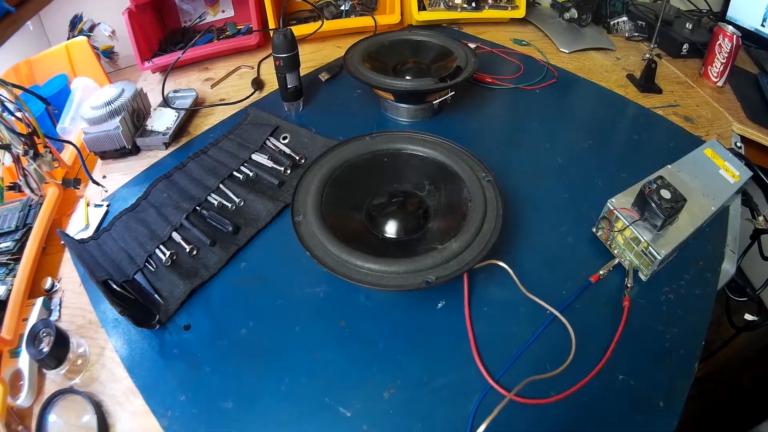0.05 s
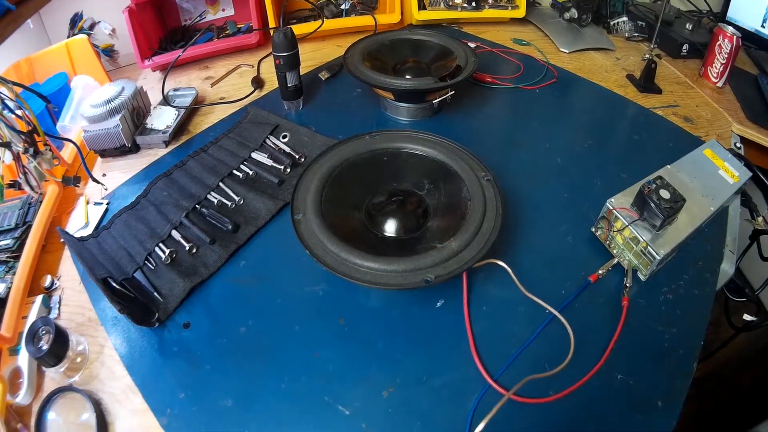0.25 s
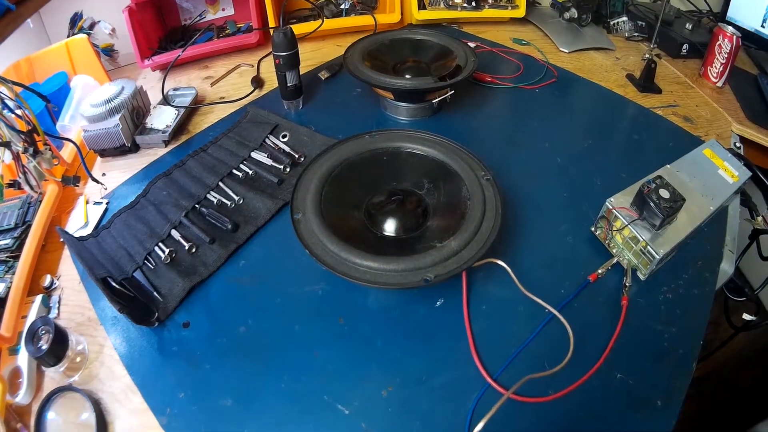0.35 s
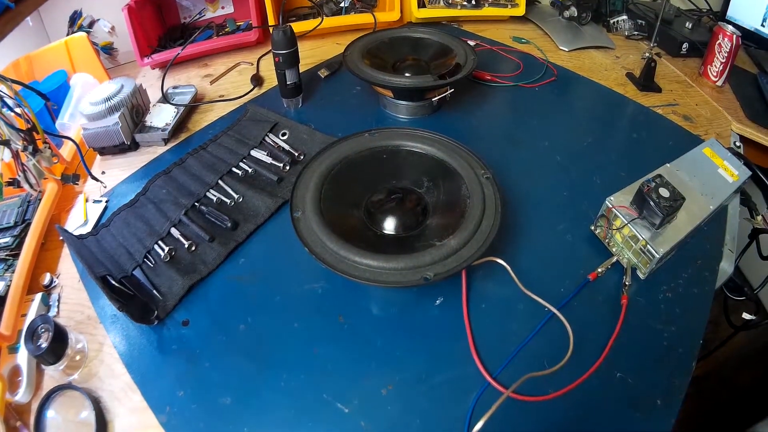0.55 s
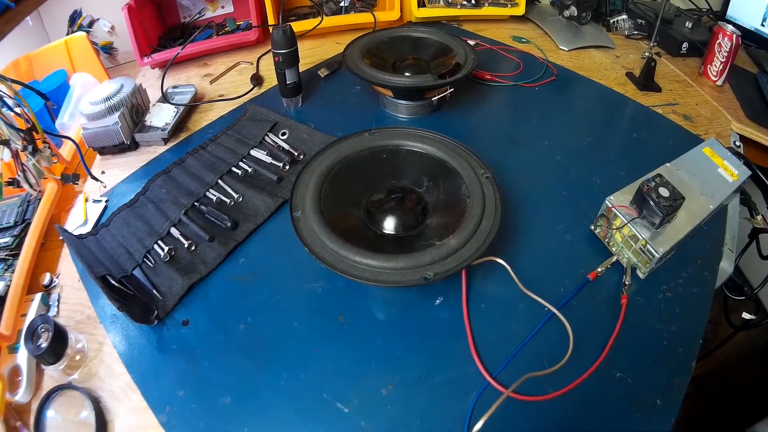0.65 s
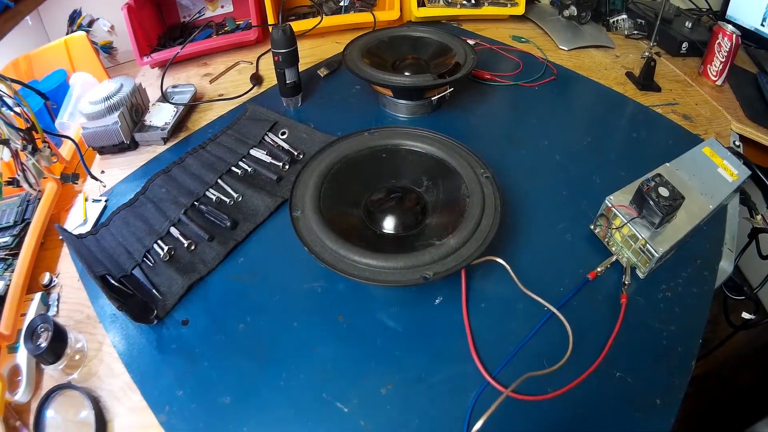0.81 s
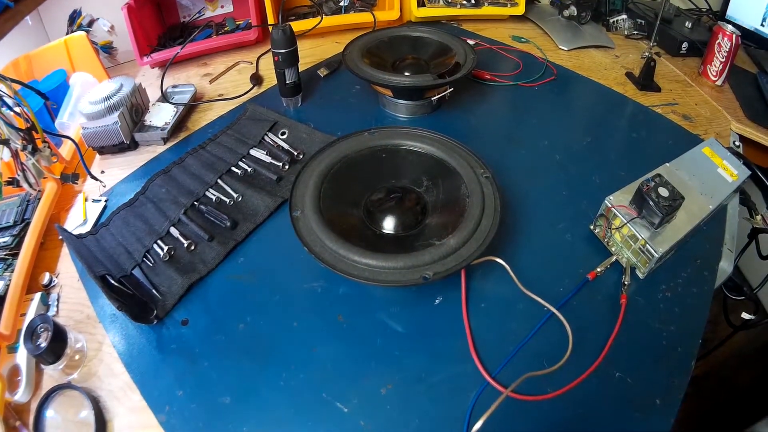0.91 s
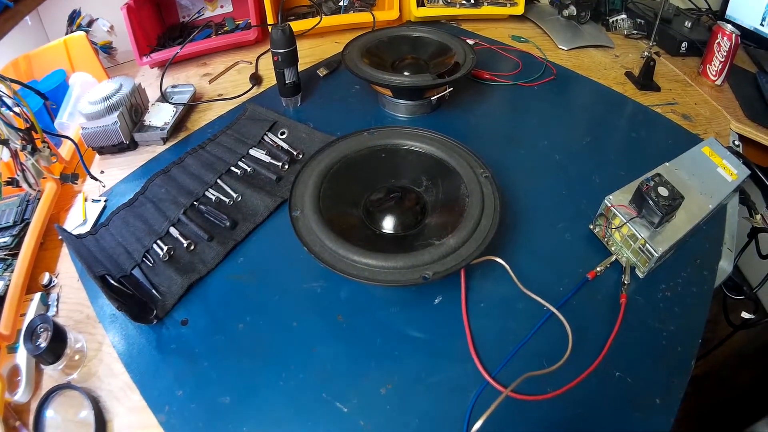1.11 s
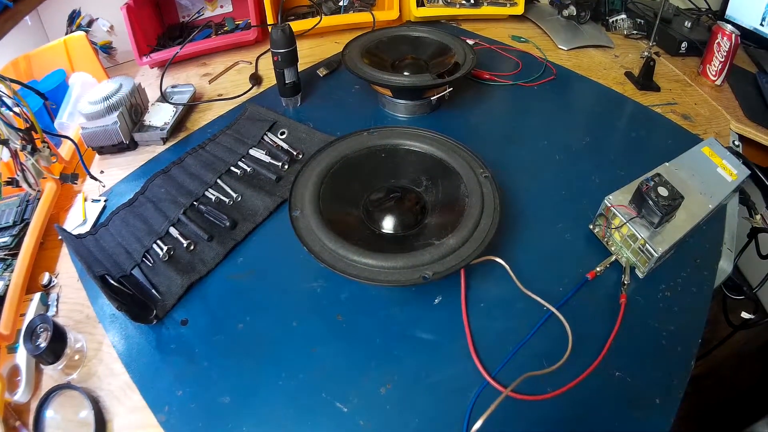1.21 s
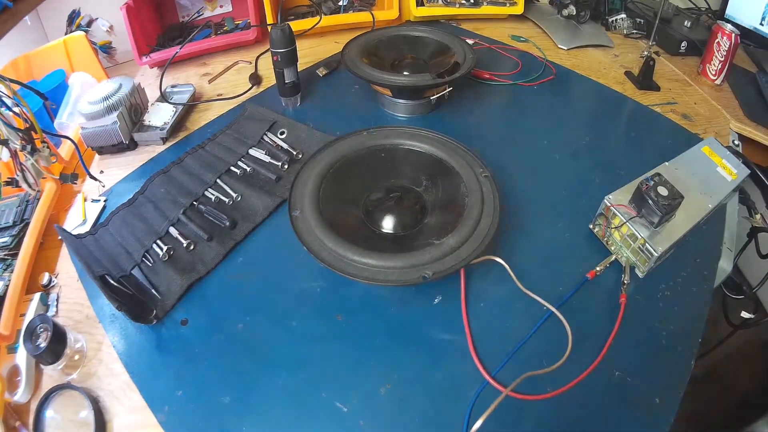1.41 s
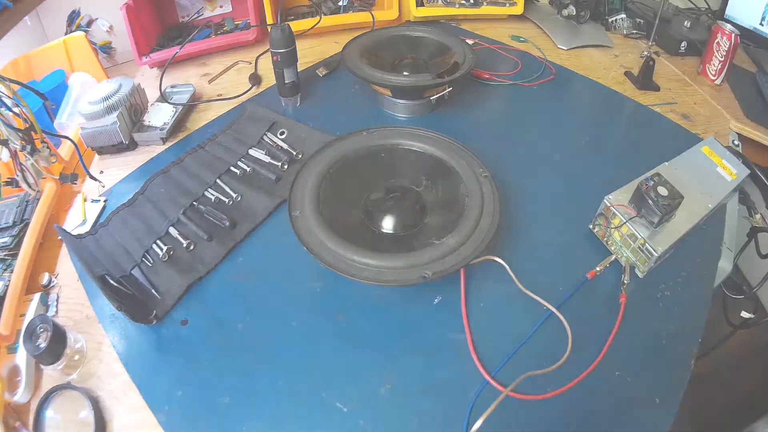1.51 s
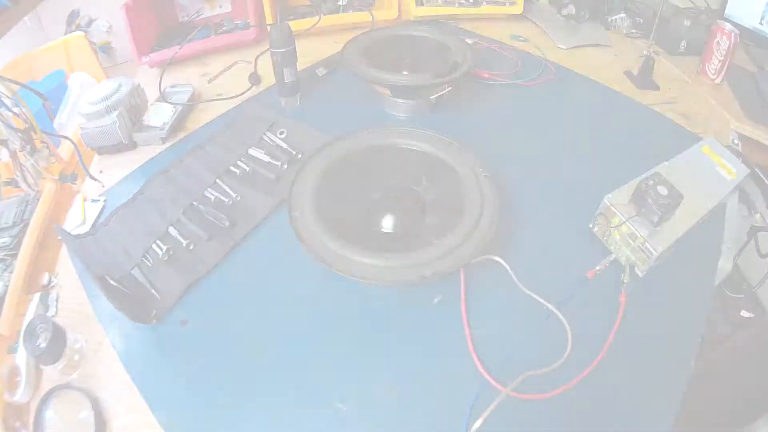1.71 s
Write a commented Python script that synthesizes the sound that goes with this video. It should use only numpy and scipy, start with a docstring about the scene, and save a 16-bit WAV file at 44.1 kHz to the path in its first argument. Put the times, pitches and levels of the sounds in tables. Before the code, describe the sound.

A single short electrical pop snaps from a nearby loudspeaker in a workshop, with no real echo. Before and after it, cooling fans whir quietly with a faint high whine and hiss, fading at the end.

```python
"""Cooling fans run throughout: rush of air, blade hum and thin motor whine over faint hiss.
At 0.2 s a power supply kicks the coil of a loudspeaker lying on a workbench.
The cone's modes ring briefly: one dry pop, with faint reflections from things close by.
The sound fades out at the end."""
import sys
import numpy as np
from scipy import signal
from scipy.fft import rfft, irfft
from scipy.io import wavfile
from scipy.ndimage import uniform_filter1d

SR = 44100
rng = np.random.default_rng(int(sys.argv[2]) if len(sys.argv) > 2 else 0)


def persist_wave(psi):
    """Save psi, clipped to +-1, as 16-bit WAV."""
    counts = np.round(np.clip(psi, -1, 1) * 32767).astype(np.int16)
    wavfile.write(sys.argv[1], SR, np.atleast_2d(counts).T)


N = 77175

# air rush spectrum (frequency [Hz], relative density [dB])
RUSH_SPECTRUM = [(20, -2.5), (60, 1), (180, 3), (330, -1), (450, 3), (530, -1.5), (750, 1.5), (920, -5),
                 (1250, -1), (1500, -5), (1800, -13.5), (2600, -16), (3200, -20), (3800, -16), (4500, -21),
                 (5400, -17.5), (6300, -27.5), (14000, -45.5)]
# fan and motor tones (frequency [Hz], level [dB], rms pitch wobble [ratio])
HUM_LINES = [(120.5, -80, 0.0022), (202.1, -67.5, .008), (407, -72, 0.0054), (466.2, -71.5, .012),
             (730, -75, 0.0037), (844, -76, .002), (1122.7, -63, 0.0009), (1412, -74, .002),
             (1514, -78, .004)]
# motor whine (frequency [Hz], level before gain [dB])
WHINE_LINES = [(2799, -80.5), (3359, -87), (3752, -84), (3849, -85.5), (4000, -88), (4215, -88.5),
               (4312, -85.5), (4474, -87), (4640, -84), (5066, -80.5), (5184, -85), (5281, -84.5),
               (5378, -88.5)]
# highest whine; close lines beat (frequency [Hz], mid-scene level [dB])
TOP_WHINE_LINES = [(5475, -82), (5495, -81), (5593, -87.5), (6019, -90.5), (6874, -91)]
# cone resonances (frequency [Hz], relative peak gain [dB], T60 [s])
CONE_MODES = [(390, -2.5, .015), (910, -2.5, .022), (1142, 0, 0.022), (1453, 8, 0.0074),
              (1632, 11.5, .0164), (2340, 3, .0063), (2922, 10, 0.0078), (3440, 9, .005),
              (4627, 10, 0.0061), (5450, 2, .0057), (6430, 1.5, 0.003), (6843, 5.5, .0051),
              (8500, 2.5, .0069), (9600, 8.5, .0032), (10200, 10.5, 0.0043)]
# cancellations between parts of the cone (frequency [Hz], width [Hz])
CONE_NULLS = [(2030, 81), (2660, 120), (4150, 130), (11250, 400)]

POP_S = .20642
TIME_S = np.arange(N) / SR
FROM_MID_S = TIME_S - TIME_S.mean()


def amp(db):
    """Decibels to gain."""
    return 10 ** (np.asarray(db) / 20)


def unit(x):
    """Scale to rms 1."""
    return x / np.sqrt(np.mean(x ** 2) + 1e-20)


def drift(rate_hz):
    """Slow random motion, rms 1."""
    hz = np.fft.rfftfreq(2 * N, 1 / SR)
    spectrum = rfft(rng.standard_normal(2 * N)) / (1 + (hz / rate_hz) ** 4)
    return unit(irfft(spectrum)[:N])


def lowpass(x, hz):
    """Steep zero-delay low-pass."""
    return signal.fftconvolve(x, signal.firwin(201, hz, fs=SR), "same")


def tone(hz, db, wobble=.0007, waver_db=1.5):
    """Sine wavering in pitch and level."""
    cycles = np.cumsum(hz * (1 + wobble * drift(rate_hz=14))) / SR + rng.random()
    waver = amp(waver_db * drift(rate_hz=8.1))
    return amp(db) * unit(waver * np.sin(2 * np.pi * cycles))


def hiss(level_db=-69, top_hz=13800):
    """Even microphone hiss."""
    return amp(level_db) * unit(lowpass(rng.standard_normal(N), top_hz))


def fan_rush(level_db=-57, patch_db=1.16, swell_db=.4):
    """Turbulent air: shaped noise with faint drifting patches and a slow swell."""
    hz, _, noise = signal.stft(rng.standard_normal(N), SR, nperseg=1024)
    patches = uniform_filter1d(rng.standard_normal(noise.shape), size=8, axis=0)
    patches = unit(uniform_filter1d(patches, size=12, axis=1))
    points_hz, points_db = np.transpose(RUSH_SPECTRUM)
    colour_db = np.interp(np.log(hz + 1), np.log(points_hz), points_db)[:, None]
    _, air = signal.istft(noise * amp(colour_db + patch_db * patches), SR, nperseg=1024)
    return amp(level_db + swell_db * drift(rate_hz=4)) * unit(air[:N])


def fan_tones(whine_gain_db=1, top_rise_db_per_s=4):
    """Blade hum and motor whine; the highest lines slowly grow."""
    hum = sum(tone(hz, db, wobble, waver_db=-.17) for hz, db, wobble in HUM_LINES)
    whine = sum(tone(hz, db + whine_gain_db) for hz, db in WHINE_LINES)
    top = sum(tone(hz, db) for hz, db in TOP_WHINE_LINES)
    return hum + whine + top * amp(top_rise_db_per_s * FROM_MID_S)


def bench_scatter(level_db=-33.5, t60_s=.01, delay_s=.0005):
    """Dense reflections of the pop off nearby tools and boxes, as a noise burst."""
    age_s = TIME_S - POP_S - delay_s
    decay = np.exp(-np.log(1000) * np.maximum(age_s, 0) / t60_s)
    return amp(level_db) * (age_s > 0) * decay * rng.standard_normal(N)


def cone_pop(gain_db=-.15, lag_hz=4700, lag_width_hz=4200, rolloff_hz=5990, rolloff_width_hz=4030):
    """One voice-coil kick rings all cone modes; the middle band crosses late, as bending waves."""
    hz = np.fft.rfftfreq(2 * N, 1 / SR)
    ring = 0
    for mode_hz, db, t60_s in CONE_MODES:
        loss = 1j * hz * np.log(1000) / (np.pi * t60_s)
        ring += amp(db) * loss / (mode_hz ** 2 - hz ** 2 + loss)
    for null_hz, width_hz in CONE_NULLS:
        detuning = null_hz ** 2 - hz ** 2
        ring *= detuning / (detuning + 1j * hz * width_hz)
    # above rolloff_hz the cone follows the coil less and less
    rolloff = rolloff_hz ** 2 / (rolloff_hz ** 2 - hz ** 2 + 1j * hz * rolloff_width_hz)
    lag_poles = lag_hz ** 2 - hz ** 2 + 1j * hz * lag_width_hz
    lag_allpass = lag_poles.conj() / lag_poles
    onset_delay = np.exp(-2j * np.pi * hz * POP_S)
    return amp(gain_db) * irfft(ring * rolloff * lag_allpass * onset_delay)[:N]


def scene(settle_db_per_s=2):
    """The pop over fans and hiss that grow slightly quieter; mono."""
    background = (fan_rush() + fan_tones() + hiss()) * amp(-settle_db_per_s * FROM_MID_S)
    return (background + bench_scatter() + cone_pop())[None]


def record(dry):
    """Linear fade-out, then band limit."""
    start_s, end_s = 1.235, 1.92
    fade = np.clip((end_s - TIME_S) / (end_s - start_s), 0, 1)
    return lowpass(dry[0] * fade, hz=15100)[None]


dry = scene()
out = record(dry)
persist_wave(out)
```